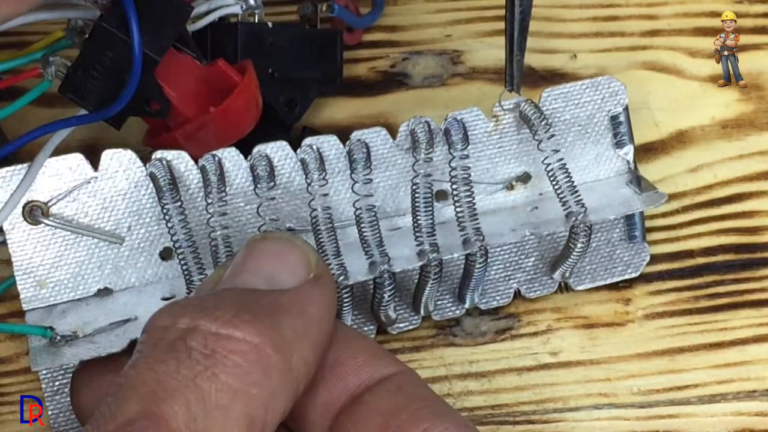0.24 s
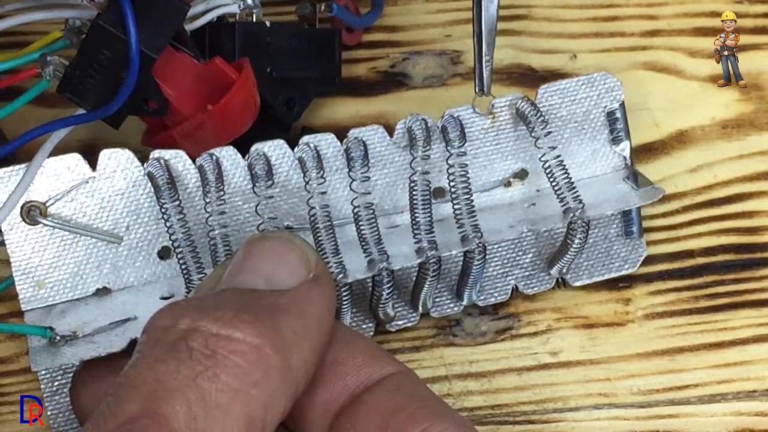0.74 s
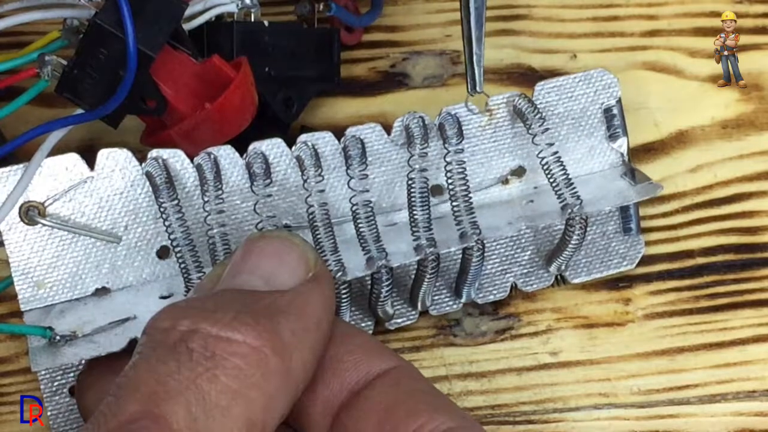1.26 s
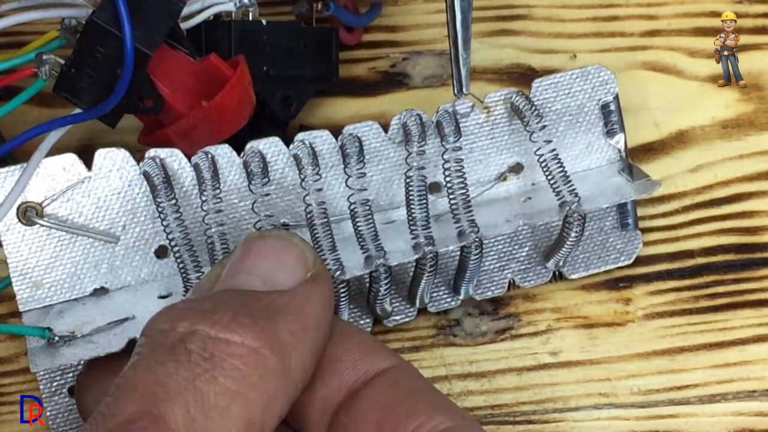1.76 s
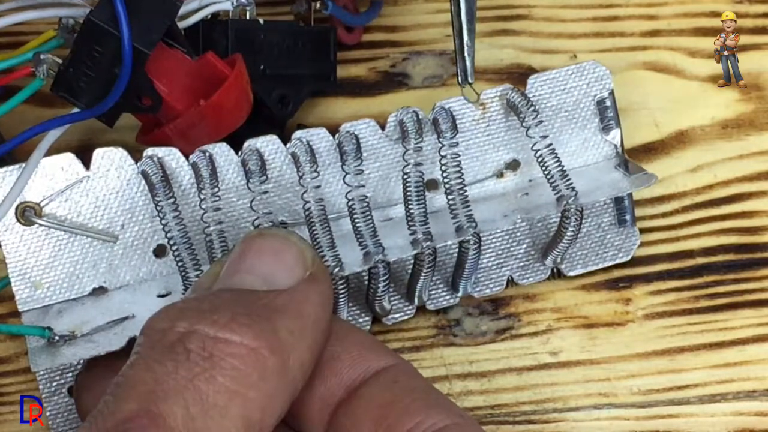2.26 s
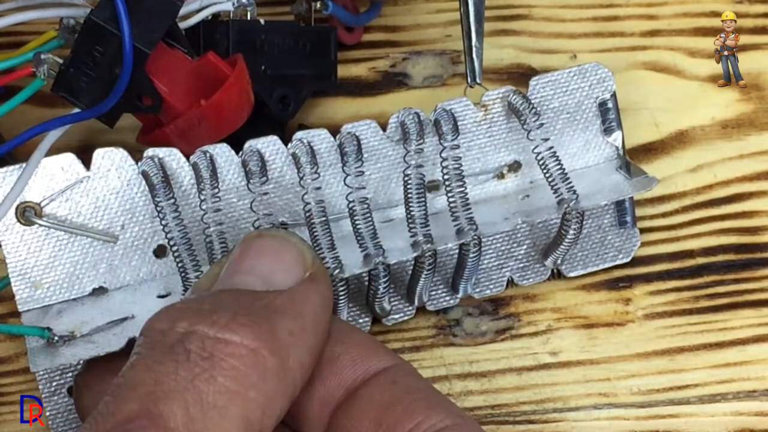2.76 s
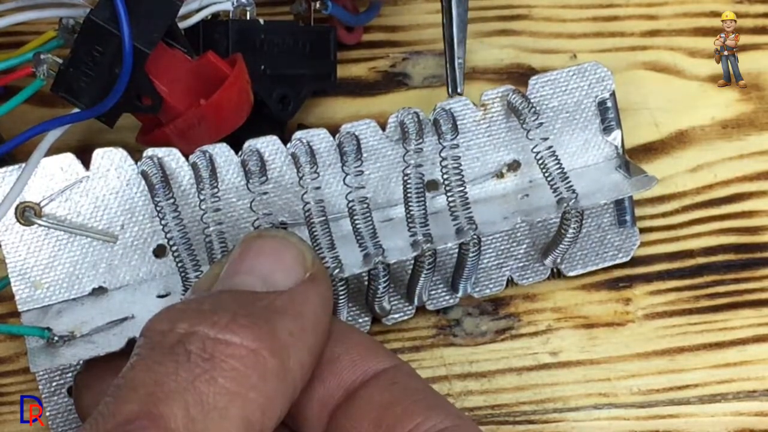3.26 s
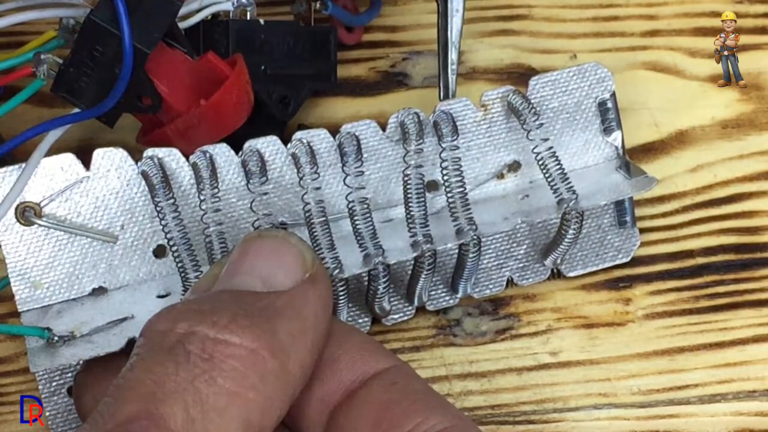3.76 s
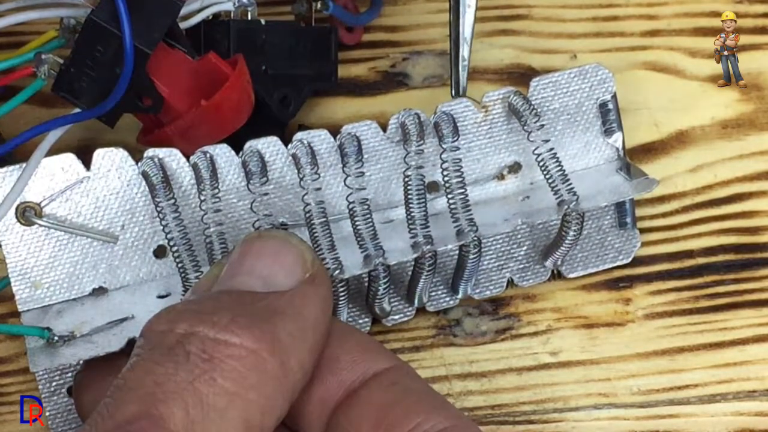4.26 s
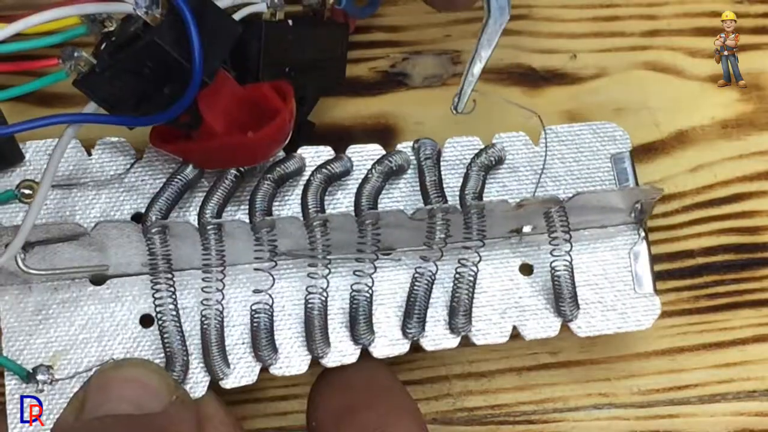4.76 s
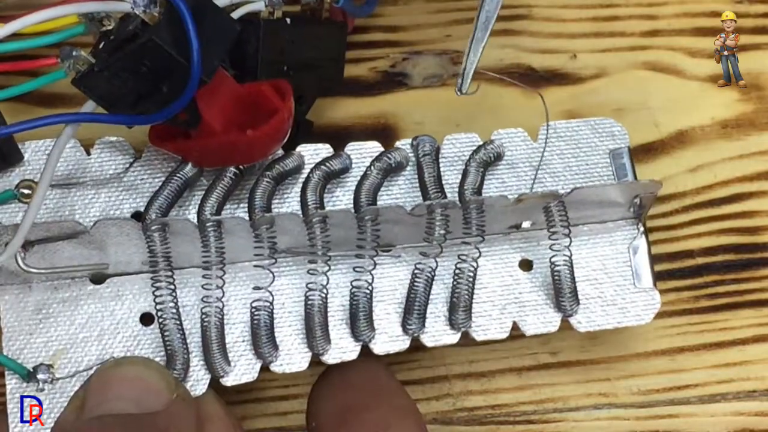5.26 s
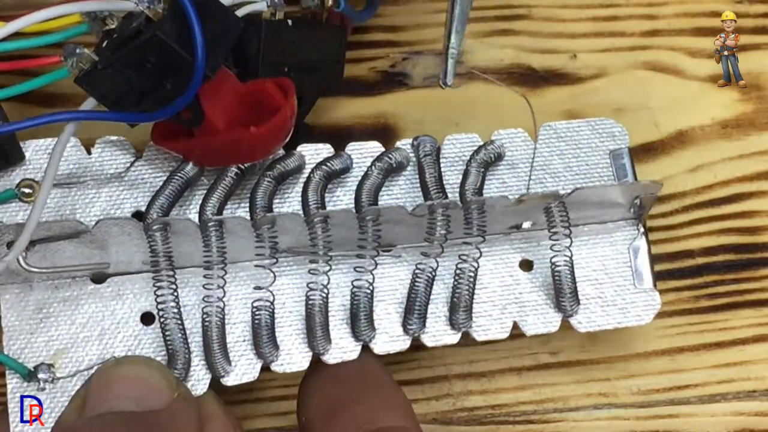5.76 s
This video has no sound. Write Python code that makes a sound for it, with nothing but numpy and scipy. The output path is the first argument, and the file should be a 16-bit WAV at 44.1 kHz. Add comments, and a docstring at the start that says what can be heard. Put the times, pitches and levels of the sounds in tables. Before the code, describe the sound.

At a wooden workbench, steel tweezers pick at the coiled wire of a heating element, making irregular close clicks, short scrapes and small pings that ring briefly. A hand thumps the bench softly and fingers rub the backing card. After a sparser stretch, a loose wire drags over the card's edge with a thin, raspy squeal. Finally the tweezers clack down on the wood. Faint room noise and hum lie beneath.

```python
"""At a wooden workbench, steel tweezers pick at the coiled wire of a heating element.
The tips scrape, pluck and tick the coil, whose modes ring briefly on its mica card. Fingers rub the
card and the hand bumps the bench. A loose end of wire is dragged over the card's edge and squeals by
stick-slip friction. At last the tweezers clack down on the wood. Room noise and a faint hum lie beneath."""
import sys
import numpy as np
from scipy import signal
from scipy.fft import rfft, irfft, next_fast_len
from scipy.io import wavfile
from scipy.ndimage import uniform_filter1d

SR = 44100
rng = np.random.default_rng(int(sys.argv[2]) if len(sys.argv) > 2 else 0)


def dump_mix(stems):
    """Bounce the given channels to the path in sys.argv[1] as a 16-bit WAV at rate SR."""
    frames = np.atleast_2d(stems).T  # one column per channel
    limited = np.clip(frames, -1, 1)  # hard clip at full scale
    pcm = np.round(limited * 32767).astype(np.int16)
    wavfile.write(sys.argv[1], SR, pcm)


N = 265482
TIME = np.arange(N) / SR
AGE = TIME[:SR // 3]   # seconds since the onset of one short sound

# boundaries of the four registers: edge_hz
REGISTER_EDGES = [900, 2400, 4800, 7500, 15500]
# resonances of the taut loose wire: centre_hz, width_hz, gain_db
WIRE_RESONANCES = [(2300, 93, -12), (3410, 53, -1.5), (4040, 760, -7), (5450, 320, -16.5),
                   (6410, 410, -21.5), (8400, 130, -5), (8770, 320, 0.5), (11300, 770, -26),
                   (13500, 1600, -12)]


def from_db(db):
    """Amplitude ratio of a level in decibels."""
    return 10 ** (np.asarray(db) / 20)


def rms_one(x):
    """Normalisation to unit mean power."""
    return x / np.sqrt(np.mean(x ** 2) + 1e-20)


def peak_one(x):
    """Normalisation to unit power over the loudest 4 ms."""
    return x / np.sqrt(uniform_filter1d(x ** 2, 176).max() + 1e-20)


def add(out, start_s, sound):
    """Superposition: a sound joins the mix at its onset."""
    at = max(round(start_s * SR), 0)
    out[at:at + len(sound)] += sound[:max(N - at, 0)]


def band(x, hz, kind="band"):
    """Butterworth filtering: a flat passband with gentle skirts."""
    return signal.sosfilt(signal.butter(2, hz, kind, fs=SR, output="sos"), x + 1e-18)


def coloured(x, spectrum):
    """Spectral shaping by a gain curve interpolated over log frequency."""
    hz, db = np.transpose(spectrum)
    size = next_fast_len(len(x))
    log_hz = np.log(np.fft.rfftfreq(size, 1 / SR) + 1)
    gain = from_db(np.interp(log_hz, np.log(hz), db))
    return rms_one(irfft(rfft(x, size) * gain, size)[:len(x)])


def resonate(x, peaks, direct_db):
    """Forced response of parallel resonators, added to a direct path."""
    out = from_db(direct_db) * x
    for hz, width_hz, db in peaks:
        out = out + from_db(db) * signal.lfilter(*signal.iirpeak(hz, hz / width_hz, fs=SR), x + 1e-18)
    return out


def gliding(x, hz, width_hz):
    """Forced response of a resonator whose centre follows the curve hz."""
    spin = np.exp(2j * np.pi * np.cumsum(hz) / SR)
    pole = np.exp(-np.pi * width_hz / SR)
    return rms_one((signal.lfilter([1 - pole], [1, -pole], x / spin) * spin).real)


def decay(t60):
    """Damping: an exponential fall of 60 dB in t60 seconds."""
    return from_db(-60 * AGE / max(t60, 1e-3))


def mode(hz, t60):
    """Free vibration of one mode: a damped sine of random phase."""
    return decay(t60) * np.sin(2 * np.pi * (hz * AGE + rng.random()))


def burst(t60):
    """Modal overlap: modes too dense to tell apart decay together as noise."""
    return rng.standard_normal(len(AGE)) * decay(t60)


def strokes(rows, attack_s, swell_db):
    """Friction envelopes, one a row: each swells as pressure builds and decays once let go."""
    gains = []
    for start_s, length_s, level_db, t60, *_ in rows:
        age = TIME - start_s
        onset = np.clip(age / attack_s, 0, 1)
        pressure_db = swell_db * (np.minimum(age / length_s, 1) - 1)
        release_db = -60 * np.clip((age - length_s) / t60, 0, 2)
        gains.append(onset * from_db(level_db + pressure_db + release_db))
    return np.array(gains)


def overlap(gains, rows):
    """Incoherent addition: the strokes' joint gain and the power-weighted mean of their last column."""
    power = gains ** 2 + 1e-18
    return np.sqrt(power.sum(0)), np.array(rows)[:, -1] @ power / power.sum(0)


def octaves_from(hz):
    """Interval from a pitch up to the geometric centre of each register."""
    return np.log2(np.sqrt(np.multiply(REGISTER_EDGES[:-1], REGISTER_EDGES[1:])) / hz)


def registers(colour_db, level_db, tilt):
    """Contact spectrum in dB: a sharp edge tilts it towards the treble, and force widens it."""
    plain_touch_db, widening = -46, 0.073
    octaves = octaves_from(4000)
    return colour_db + tilt * octaves + widening * (level_db - plain_touch_db) * octaves ** 2


def contact(sound, register_db):
    """The point of excitation decides how strongly each register sounds."""
    out = 0
    for low_hz, high_hz, db in zip(REGISTER_EDGES, REGISTER_EDGES[1:], register_db):
        edges = [low_hz, high_hz]
        out = out + from_db(db) * peak_one(band(band(sound, edges), edges))
    return peak_one(out)


def touched(modes):
    """Perturbation: a touch stretches and damps the coil, shifting pitches a little and levels a lot."""
    draws = rng.standard_normal((len(modes), 2))
    return zip(modes, np.exp(.014 * draws[:, 0]), 4 * draws[:, 1])


def card_at_spot():
    """Position-dependent coupling: the resonances of coil and card as one spot excites them."""
    # broad resonances of coil and card: centre_hz, width_hz, gain_db
    resonances = [(1420, 35, -8), (1987, 136, 0), (2258, 170, -0.5), (2890, 310, -10), (3574, 40, -5),
                  (4076, 41, 2), (4434, 360, -16), (5350, 25, 4.5), (5800, 103, -2.5), (6150, 240, -11.5),
                  (7120, 77, -16), (8700, 710, -9.5), (10800, 130, -29)]
    return [(hz * stretch, width_hz, db + shift_db)
            for (hz, width_hz, db), stretch, shift_db in touched(resonances)]


def coil_ring():
    """Lasting modes ring among the dense modes of many turns; the tips' grip damps high ones most."""
    # modes of coil and tweezers before the grip damps them: pitch_hz, level_db, t60_s
    coil_modes = [(1540, -20.5, 0.43), (1860, 4, 0.27), (1960, -4.5, 0.42), (2205, 5, 0.071),
                  (2422, -0.5, 0.38), (2880, 1, 0.42), (2960, -8, 0.59), (2957, -3.5, 0.98),
                  (3447, 0.5, 0.57), (3580, -17, 0.57), (4235, 0, 0.75), (4440, -7, 0.44), (4350, -8, 0.1),
                  (5370, -20, 0.53), (5350, -11, 0.75), (6020, 0.5, 0.19), (6170, -22.5, 0.18),
                  (6580, -8, 0.27), (6780, -10, 1)]
    grip_t60, reference_hz = 0.83, 3000
    lasting = 0
    for (hz, db, t60), stretch, shift_db in touched(coil_modes):
        grip = decay(grip_t60 * reference_hz / hz)
        lasting = lasting + from_db(db + shift_db) * mode(hz * stretch, t60) * grip
    dense = band(resonate(burst(t60=.26), card_at_spot(), direct_db=-7), 6500, "low")
    return peak_one(peak_one(lasting) + peak_one(dense))


def glitter(t60):
    """A short span vibrates fast: nine stray high modes of the wire under the tip."""
    return peak_one(sum(rng.exponential() * mode(hz, t60) for hz in rng.uniform(6500, 15000, 9)))


def room_tone(noise_db=-69, hum_hz=49, hum_db=-80):
    """Stationary background: bass-heavy noise and a faint pure-tone hum."""
    # spectrum of the room noise: frequency_hz, gain_db
    spectrum = [(15, -20), (25, -9.5), (53, -1.5), (76, -8.5), (141, -7.5), (185, -11.5), (249, -10.5),
                (363, -15.5), (503, -17.5), (575, -16), (840, -20.5), (1160, -19.5), (2840, -21.5),
                (7920, -28), (16000, -35.5)]
    noise = from_db(noise_db) * coloured(rng.standard_normal(N), spectrum)
    return noise + from_db(hum_db) * np.sqrt(2) * np.sin(2 * np.pi * hum_hz * TIME)


def scrapes(catches_per_s=1500, chips_per_s=140, turns_per_s=20, timbres=7, treble_hz=4800):
    """Friction as shot noise: each random catch is a tiny pluck, coloured by the turn being crossed."""
    # strokes of the tips along the coil: start_s, length_s, level_db, t60_s, treble_db
    passes = [(0.0, 0.012, -51, 0.92, -3), (0.089, 0.1, -53, 0.19, -6), (0.319, 0.061, -59, 0.31, -5.5),
              (0.418, 0.045, -50.5, .2, 1), (0.478, 0.028, -40, 0.5, -2), (0.524, 0.16, -50, 0.7, -7.5),
              (0.69, 0.032, -42, 0.38, -5.5), (1.267, 0.034, -45, .26, -0.5),
              (1.376, 0.092, -46, 0.22, -2.5), (1.81, 0.045, -48.5, 0.36, -14),
              (1.905, 0.025, -58.5, 0.6, -22), (2.086, 0.075, -45.5, 0.29, -9),
              (2.235, .025, -52, 0.46, -15), (2.327, 0.052, -40.5, .2, 13),
              (2.376, 0.019, -34.5, 0.22, -15.5), (4.387, 0.042, -43.5, 0.041, -8.5),
              (5.538, 0.062, -55.5, .25, -23)]
    # spectral shaping of the scrape: frequency_hz, gain_db
    spectrum = [(260, -21), (450, -14), (538, -4), (737, -13.5), (1380, -4), (1580, -7), (1920, -13),
                (2580, -8.5), (2910, -9), (4360, -6), (4700, -8.5), (5970, -9), (16000, -45)]
    gain, treble_db = overlap(strokes(passes, attack_s=0.0062, swell_db=9.5), passes)
    sizes = from_db(3.2 * np.minimum(rng.exponential(1, N), 3)) * rng.choice([-1, 1], N)
    catches = sizes * (rng.random(N) < catches_per_s / SR)
    turn = np.cumsum(rng.random(N) < turns_per_s / SR) % timbres
    rasp = 0
    for k in range(timbres):
        snag = peak_one(resonate(burst(t60=.012), card_at_spot(), direct_db=-7))
        catch = snag + from_db(-15) * coil_ring() * decay(t60=0.33)
        rasp = rasp + signal.oaconvolve(catches * (turn == k), rms_one(catch))[:N]
    rasp = coloured(rasp, spectrum)
    # now and then a sharp edge of the tip chips at the wire
    chips = sizes * (rng.random(N) < chips_per_s / SR)
    crackle = 0
    for k in range(timbres):
        chip = burst(t60=.006) + .3 * glitter(t60=.012)
        crackle = crackle + signal.oaconvolve(chips * (turn == k), chip[:SR // 50])[:N]
    crackle = from_db(-11) * rms_one(band(crackle, [6500, 12000]))
    low = rms_one(band(rasp, treble_hz, "low"))
    high = rms_one(band(band(rasp, treble_hz, "high"), treble_hz, "high"))
    treble = np.clip(from_db(treble_db), 0, .95)
    return from_db(-5) * gain * (np.sqrt(1 - treble ** 2) * low + treble * (high + crackle))


def plucks(slide_s=.012, crack_t60=0.031, ping_cycles=520, ping_lift_db=5.5):
    """Sudden release: the tip slides off, the coil cracks, the freed span pings and the card thuds."""
    # the coil slips off the tips: start_s, level_db, tilt_db_per_octave, ping_hz, ring_db
    releases = [(0.0024, -40, 1.5, 4260, -13), (0.023, -43, -1, 4070, 5.5),
                (0.106, -43.5, -2.5, 1420, -12.5), (0.3357, -54.5, 4, 4200, 7), (0.3641, -52, 4, 5900, -7),
                (0.497, -40.5, 18, 4260, -7), (0.5148, -32, -1.5, 2015, -14), (0.61, -42.5, -2, 1860, -5.5),
                (0.6945, -37.5, -2, 1822, 9), (0.707, -45, -6, 1890, -1), (0.7251, -42, -2, 1286, -10),
                (0.856, -50.5, -9, 2890, -6.5), (1.1052, -47, -0.5, 4320, -3),
                (1.2333, -52, -7.5, 4330, -2), (1.2754, -41.5, -3.5, 2890, -2),
                (1.3359, -46.5, -1, 5500, -1), (1.4089, -42, 1.5, 3460, -4.5),
                (1.4688, -35.5, -2, 2990, -11), (1.614, -58, -7, 4390, 2), (1.749, -48, 2.5, 3390, -8),
                (1.8212, -39.5, -2, 3380, -5), (1.8386, -36.5, -1, 2770, -5.5),
                (1.922, -47.5, -3, 3120, -7), (2.1337, -45, 2, 3010, -1), (2.2239, -39, -0.5, 2890, -6.5),
                (2.3229, -43, 1, 3180, -1), (2.378, -28.5, 0.5, 2880, -36), (2.382, -29, 0.5, 5800, -26),
                (2.752, -58, -2.5, 5720, -3), (3.1198, -60.5, -8, 2960, -13),
                (3.5346, -45.5, -2, 1872, -1.5), (3.6715, -49, 2.5, 4400, -6),
                (3.6802, -41.5, -6, 1873, -5), (3.7318, -45.5, -3.5, 2880, -8.5),
                (3.8113, -56, -7, 2880, -16), (4.3249, -39.5, 1.5, 2830, -10.5),
                (4.3799, -36.5, 3, 2880, -12.5)]
    # a plain pluck, from the lowest register up: level_db
    colour_db = [-12.5, -7, -7, -15.5]
    out = np.zeros(N)
    onset = 1 - np.exp(-AGE / .0016)
    pressure = np.linspace(0, 1, round(slide_s * SR)) ** 2
    for start_s, level_db, tilt, ping_hz, ring_db in releases:
        near_ping = np.exp(-(2 * octaves_from(ping_hz)) ** 2)
        register_db = registers(colour_db, level_db, tilt) + ping_lift_db * near_ping
        spot = card_at_spot()
        crack = peak_one(resonate(burst(crack_t60), spot, direct_db=-16))
        crack += from_db(-13) * glitter(t60=0.019)
        zing = peak_one(resonate(burst(crack_t60), [(ping_hz, 170, 0)], direct_db=-17))
        ring = coil_ring() + from_db(-2) * mode(ping_hz, t60=ping_cycles / ping_hz)
        thud = from_db(-28) * peak_one(band(burst(t60=0.06), [280, 1100]))
        pluck = onset * (crack + from_db(-1) * zing + from_db(ring_db) * ring)
        slide = peak_one(resonate(pressure * rng.standard_normal(len(pressure)), spot, direct_db=-29))
        add(out, start_s - slide_s, from_db(level_db - 19) * slide)
        add(out, start_s, from_db(level_db) * (contact(pluck, register_db) + thud))
    return from_db(-4) * out


def finger_rubs():
    """Sliding friction: fingers shift the card, making a dull noise that follows their pressure."""
    # movements of the fingers: start_s, length_s, level_db, t60_s
    shifts = [(0.1, 0.068, -71, 1), (0.45, 0.14, -54.5, 1.1), (0.6, .15, -56.5, 2.07),
              (1.81, 0.074, -67.5, 3.6), (2.07, 0.11, -62, 0.6), (4.44, 0.025, -59, 1.5),
              (4.56, 0.22, -66, 1.6), (5.5, 0.07, -63.5, 0.44)]
    # spectrum of the rubbed card: frequency_hz, gain_db
    spectrum = [(120, -4.5), (240, -9), (350, 6.5), (480, -11.5), (800, -11.5), (1400, -9), (3000, -28.5)]
    pressure = np.linalg.norm(strokes(shifts, attack_s=0.012, swell_db=8), axis=0)
    return from_db(-2) * pressure * coloured(rng.standard_normal(N), spectrum)


def bench_bumps():
    """A soft impact excites low modes: the bench thumps, the card knocks, the room briefly responds."""
    # blows of the hand: start_s, level_db, knock_db, pitch_ratio
    blows = [(0.151, -46, -30, 0.96), (0.168, -50, -15, 1.03), (0.198, -35, -11.5, 0.99),
             (0.2491, -30.5, -15.5, 1.03), (2.387, -43, -6, 0.805), (4.688, -55, -19, 0.52),
             (4.745, -57.5, -19, 1)]
    # modes of the bench top at a pitch ratio of 1: pitch_hz, level_db, t60_s
    bench_modes = [(75, -25, 0.022), (125.4, -4, 0.14), (151, 0, 0.14), (200, -5, 0.016), (284.3, 2, 0.055),
                   (345.5, -28.5, 0.79)]
    # the card's dull knock at a pitch ratio of 1: centre_hz, width_hz, gain_db
    knock_resonances = [(356, 70, -2), (780, 80, -14), (900, 160, 9.5), (1530, 140, 5.5), (1880, 120, 9.5)]
    out = np.zeros(N)
    for start_s, level_db, knock_db, ratio in blows:
        thump = -sum(from_db(db) * decay(t60) * np.sin(2 * np.pi * ratio * hz * AGE)
                     for hz, db, t60 in bench_modes)
        force = signal.unit_impulse(len(AGE)) + from_db(-31) * burst(t60=0.24)
        spot = [(hz * ratio, width_hz, db) for hz, width_hz, db in knock_resonances]
        knock = peak_one(band(resonate(force, spot, direct_db=-55), 2200, "low"))
        room_tail = peak_one(band(burst(t60=0.4), [110, 420]))
        bump = from_db(-5) * thump + from_db(knock_db) * knock + from_db(-21) * room_tail
        add(out, start_s, from_db(level_db) * bump)
    return out


def creaks(start_s=.75, end_s=2.15, level_db=-62, spread_db=6, count=22):
    """Stress relief: held under tension by the tweezers, the coil settles in faint little rings."""
    out = np.zeros(N)
    onset = 1 - np.exp(-AGE / 0.0027)
    for moment, softness in rng.random((count, 2)):
        ring = coil_ring() * decay(t60=0.64) * onset
        add(out, start_s + moment * (end_s - start_s), from_db(level_db - spread_db * softness) * ring)
    return out


def ticks():
    """A brief, hard contact has a broad spectrum: steel clicks on wire and the coil barely rings."""
    # touches of the tips: start_s, level_db, tilt_db_per_octave
    touches = [(1.263, -49, 12), (1.2952, -39, 3), (1.3018, -37.5, -1), (1.4373, -38, -1.5),
               (1.454, -46, -3), (1.6435, -42, 11.5), (1.7932, -53, -8), (2.1, -49.5, -4),
               (2.2076, -44, -5), (4.4802, -45, -2), (4.573, -43, 5), (4.672, -35.5, -1.5),
               (4.7122, -42, -5), (4.7395, -38, -5), (4.7583, -38, -5), (4.8615, -53.5, -1),
               (5.0097, -52.5, 4), (5.023, -55.5, 5), (5.152, -49, -5), (5.162, -43, 2), (5.5746, -50, 14)]
    # a plain tick, from the lowest register up: level_db
    colour_db = [-21.5, -7, -1.5, -15]
    out = np.zeros(N)
    onset = 1 - np.exp(-AGE / .0008)
    for start_s, level_db, tilt in touches:
        click = peak_one(resonate(burst(t60=0.0048), WIRE_RESONANCES, direct_db=-12))
        click += from_db(-13) * glitter(t60=0.037)
        tick = onset * click + from_db(-22) * coil_ring()
        add(out, start_s, from_db(level_db) * contact(tick, registers(colour_db, level_db, tilt)))
    return from_db(-3) * out


def wire_drag(slips_per_s=135, jitter=0.33, spread_db=3, grit_db=-20, squeal_width_hz=450):
    """Stick-slip friction: uneven pulses drive the taut wire, which rasps and squeals."""
    # pulls over the card's edge: start_s, length_s, level_db, t60_s, squeal_db
    pulls = [(4.46, 0.027, -59.5, 0.28, 2), (4.56, 0.073, -45.5, .25, -2.5), (4.64, 0.093, -46, .17, 6),
             (4.76, 0.046, -44.5, 0.22, -9.5), (4.989, 0.014, -56, 0.39, -14),
             (5.097, 0.052, -50.5, 0.16, -12), (5.141, 0.032, -48.5, 0.093, -6)]
    # spectral shaping of the rasp: frequency_hz, gain_db
    spectrum = [(350, -58), (600, -41), (919, -7.5), (1110, -1.5), (2240, -12), (2470, -5.5), (4050, -17),
                (4910, -21), (5630, 3), (7110, -8), (8990, -24.5), (10500, -45), (16000, -21)]
    # the squeal falls and rises as the free length of wire changes: time_s, pitch_hz
    glide = [(4.57, 4800), (4.63, 4400), (4.675, 4080), (4.72, 3980), (4.76, 4150), (4.8, 4700),
             (4.83, 5480), (5.2, 5560)]
    gain, squeal_db = overlap(strokes(pulls, attack_s=0.011, swell_db=4.5), pulls)
    gap_draws, size_draws = rng.standard_normal((1500, 2)).T
    slip_s = np.cumsum(np.exp(jitter * gap_draws) / slips_per_s)
    inside = slip_s < TIME[-1]
    slips = np.zeros(N)
    slips[(slip_s[inside] * SR).astype(int)] = from_db(spread_db * np.clip(size_draws[inside], -2, 1))
    pulses = signal.fftconvolve(slips, decay(t60=0.028))[:N]
    friction = (pulses + from_db(grit_db)) * rng.standard_normal(N)
    rasp = coloured(resonate(friction, WIRE_RESONANCES, direct_db=-25), spectrum)
    # every slip catches at a slightly different length
    detune = np.interp(TIME, slip_s, rng.normal(1, .036, len(slip_s)))
    squeal_hz = np.interp(TIME, *np.transpose(glide)) * detune
    squeal = gliding(gliding(friction, squeal_hz, squeal_width_hz), squeal_hz, squeal_width_hz)
    shine = rms_one(band(friction, [8700, 9700])) + from_db(-3) * rms_one(band(friction, [11100, 12000]))
    treble = from_db(squeal_db - 4) * squeal + from_db(squeal_db / 2 - 18) * shine
    return gain * (from_db(-5) * rasp + treble)


def tweezer_clacks():
    """Impact and rebound of steel on wood: a hollow clack under the bright rattle of the two arms."""
    # the tweezers land and chatter: start_s, level_db, clack_db, steel_db
    impacts = [(5.9828, -32, -5, -1), (5.9875, -27.5, 0, -5.5), (6.0004, -36.5, 0.5, -3),
               (6.008, -34, 0, 1)]
    # modes of their clack on the wood: pitch_hz, level_db, t60_s
    clack_modes = [(918, -11, 0.16), (1115, -2, 0.14), (1312, -8, 0.17), (1450, -24, 0.16),
                   (1940, -7, 0.17), (2103, -9, 0.25), (2504, 7, 0.049), (2650, 9.5, 0.027),
                   (3020, 4, 0.07), (3240, 10.5, 0.026), (3720, -3, 0.14), (4330, -5, 0.41),
                   (5170, -10, 0.57), (6270, -2.5, 0.76)]
    # resonances of the arms: centre_hz, width_hz, gain_db
    arms = [(5770, 320, 2.5), (6830, 190, -5), (8600, 440, -9)]
    out = np.zeros(N)
    for start_s, level_db, clack_db, steel_db in impacts:
        clack = peak_one(sum(from_db(db) * mode(hz, t60) for hz, db, t60 in clack_modes))
        clack += from_db(-5) * peak_one(band(burst(t60=0.045), [900, 4200]))
        steel = peak_one(resonate(band(burst(t60=0.046), 2300, "high"), arms, direct_db=-13))
        add(out, start_s, from_db(level_db) * (from_db(clack_db) * clack + from_db(steel_db) * steel))
    return out


def scene():
    """Superposition of all sources at one close microphone."""
    metal = plucks() + ticks() + creaks() + tweezer_clacks() + scrapes() + wire_drag()
    return (metal + bench_bumps() + finger_rubs() + room_tone())[None]


def record(dry, low_hz=42, high_hz=15900):
    """Attenuation and band limiting: the level dips twice; deep bass and the top are cut."""
    # brief dips in level: start_s, length_s, gain_db
    dips = [(4.434, .014, -22), (5.633, .013, -10)]
    dip_db = sum(db * ((TIME > start_s) & (TIME < start_s + length_s)) for start_s, length_s, db in dips)
    dipped = dry * from_db(uniform_filter1d(dip_db.astype(float), size=130))
    bass_cut = signal.sosfilt(signal.butter(6, low_hz, "high", fs=SR, output="sos"), dipped)
    return signal.sosfilt(signal.ellip(10, .2, 70, high_hz, fs=SR, output="sos"), bass_cut)


dry = scene()
out = record(dry)
dump_mix(out)
```